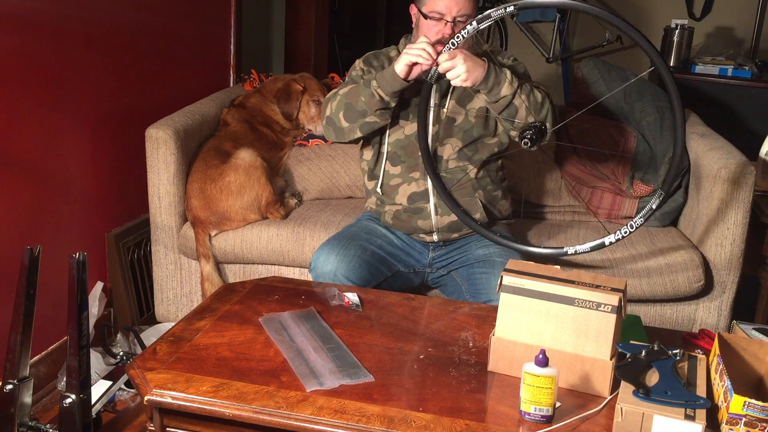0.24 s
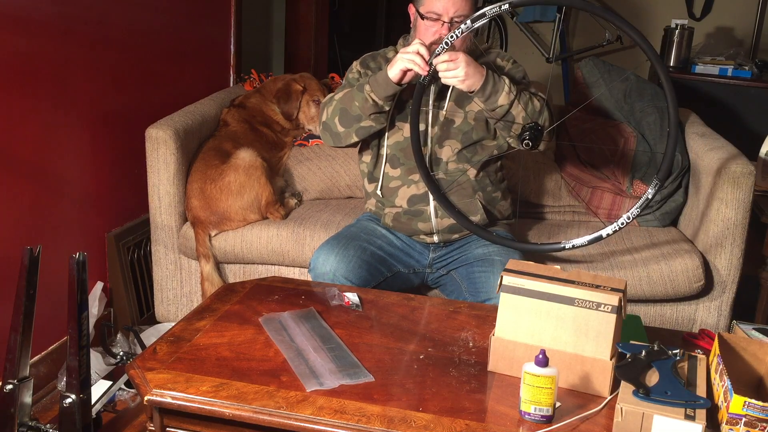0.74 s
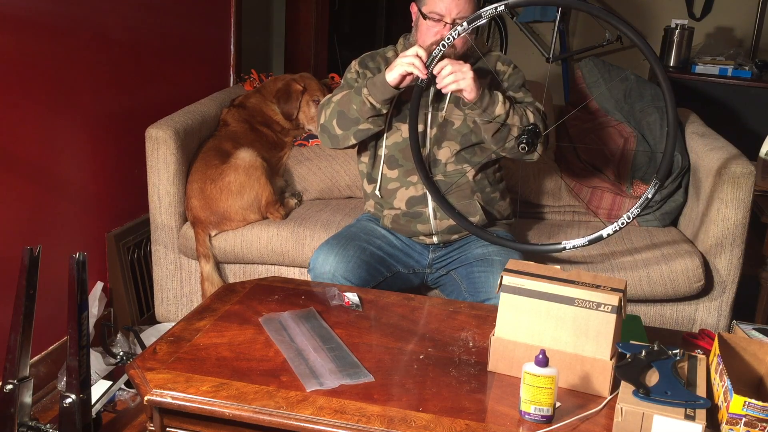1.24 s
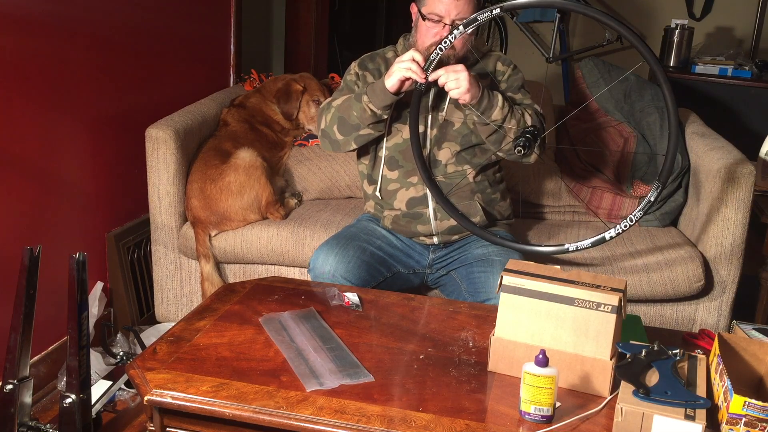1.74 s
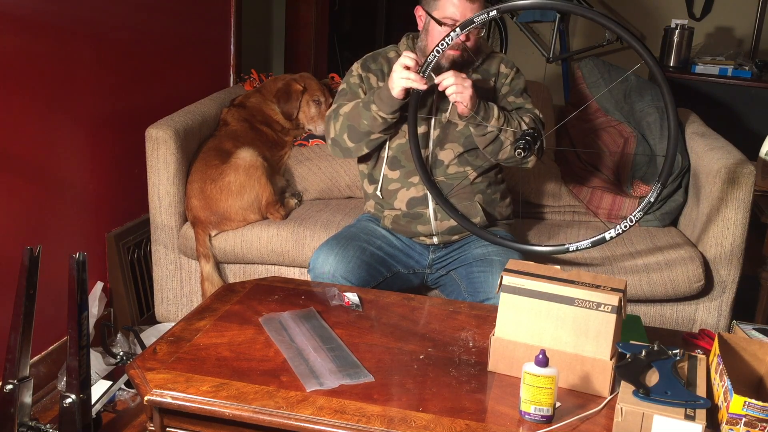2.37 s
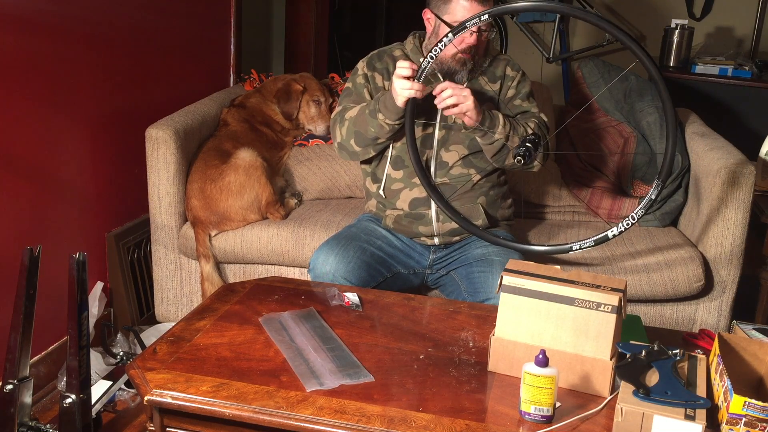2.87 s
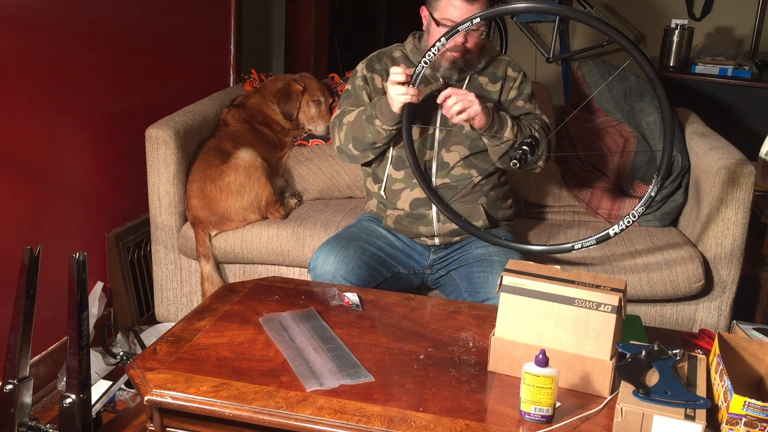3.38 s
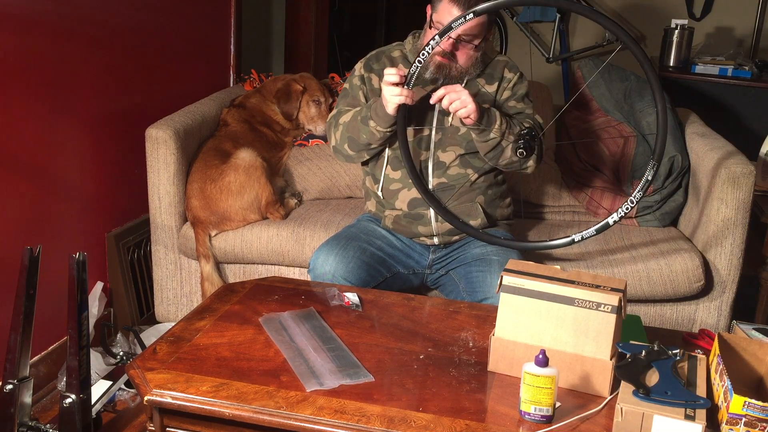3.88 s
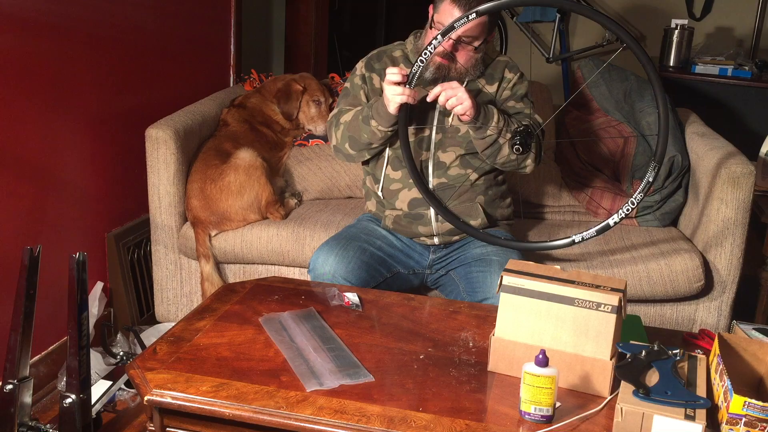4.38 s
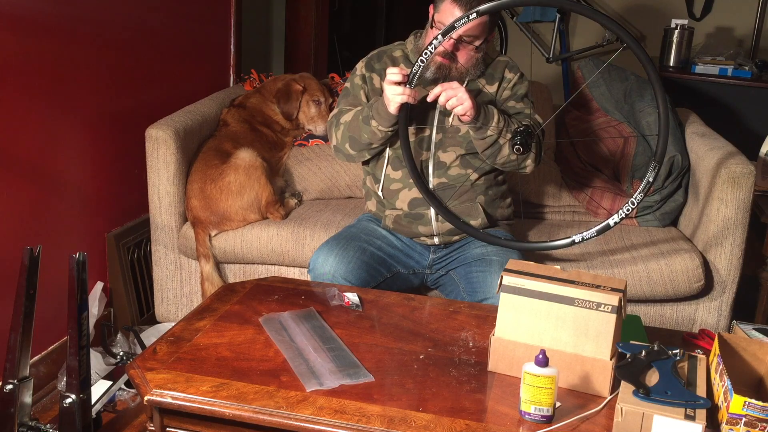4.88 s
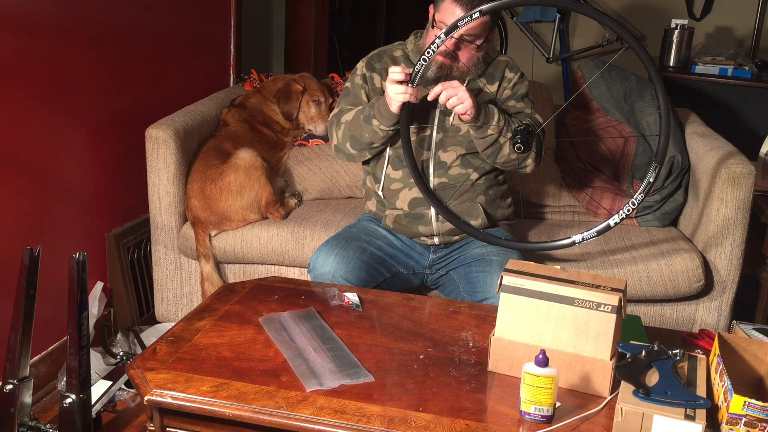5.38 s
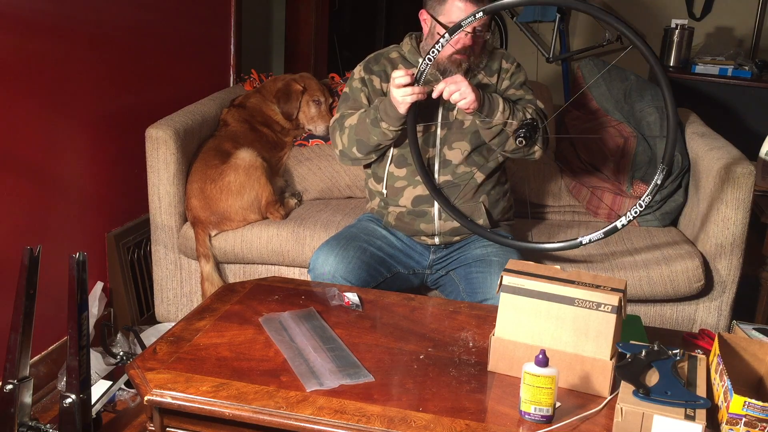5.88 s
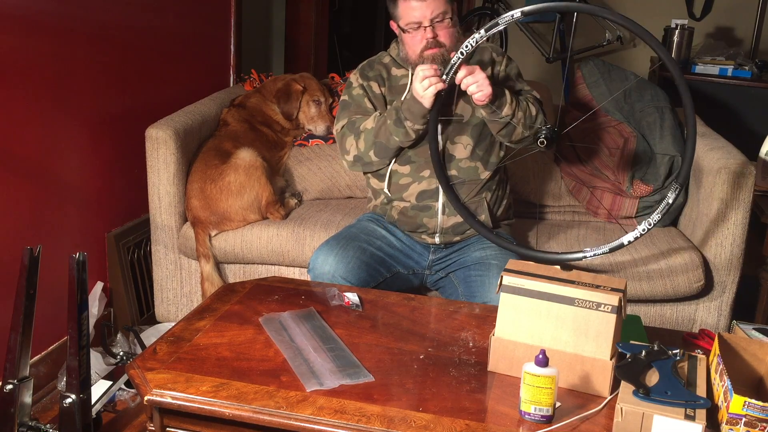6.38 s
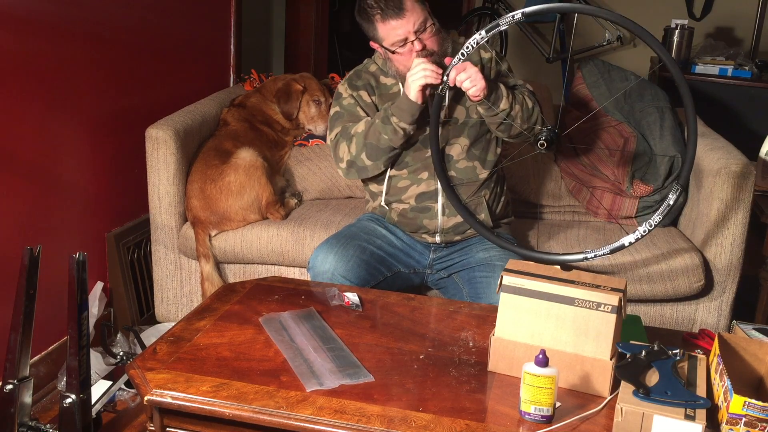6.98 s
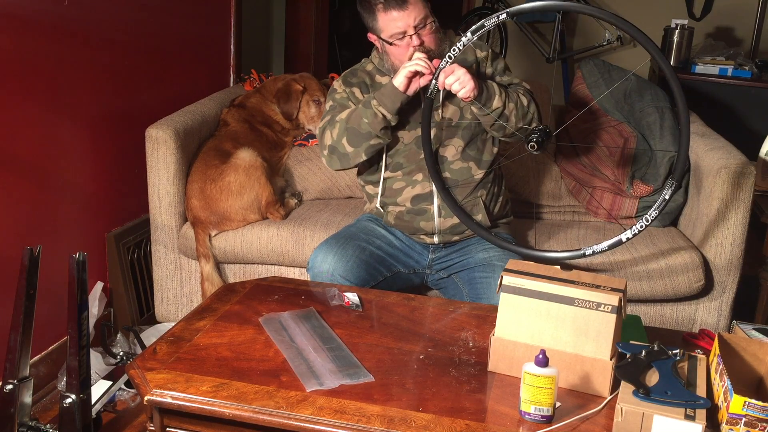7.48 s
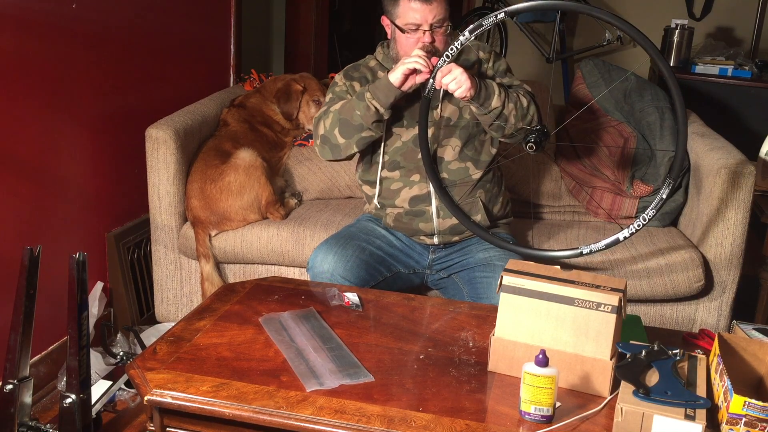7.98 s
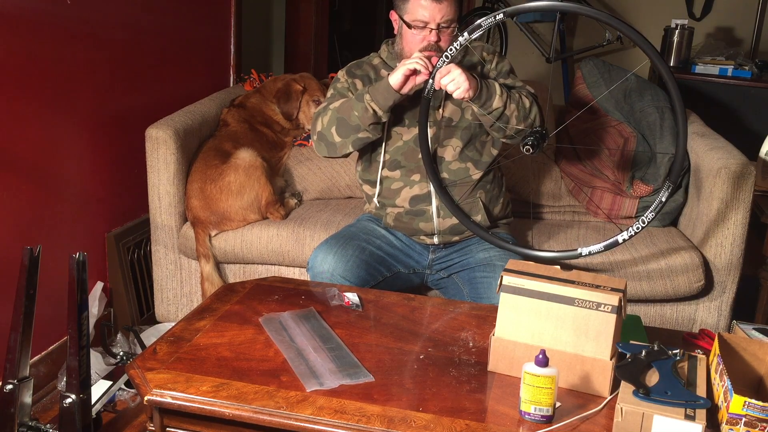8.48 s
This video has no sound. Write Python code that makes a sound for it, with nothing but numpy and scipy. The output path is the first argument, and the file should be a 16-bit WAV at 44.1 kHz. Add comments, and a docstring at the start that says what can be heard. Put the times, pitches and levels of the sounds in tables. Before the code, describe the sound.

Thin metal spokes rattle and ping at uneven intervals as someone handles a bicycle wheel indoors. Scattered light clinks lead to a run of louder clatters, a short lull and a single bright strike, followed by small clicks of spoke nipples on the rim. Each contact is up front and dies quickly in the small room. Soft cloth swishes and a faint steady hum lie underneath.

```python
"""A low appliance hum and the faint rub of hands, then a small metal tick: someone is lacing a
bicycle wheel on a living-room sofa. Nipples tick in their holes, each one hard contact with a ping.
Knocks ring single resonances of the hand-held rim. As the wheel shifts, loose steel spokes slide,
strike and chatter against each other, the hub and the rim, ringing the wheel's modes.
Sleeves and fingers swish with each change of grip, and the room answers the blows briefly."""
import sys
import numpy as np
from scipy import signal
from scipy.fft import rfft, irfft
from scipy.io import wavfile

SR = 44100
rng = np.random.default_rng(int(sys.argv[2]) if len(sys.argv) > 2 else 0)


def to_wav(sig):
    """Store sig (one row per channel, or 1-D mono) as 16-bit WAV at the path in sys.argv[1].

    Samples outside -1..1 are clipped; the rate is SR.
    """
    pcm = np.clip(np.atleast_2d(sig), -1, 1) * 32767
    pcm = np.round(pcm).astype(np.int16)
    wavfile.write(sys.argv[1], SR, pcm.T)  # frames by channels


N = 384993

# colour of the room tone: f/Hz, relative level/dB
AIR_COLOUR = [(15, -51), (25, -24), (59, -12.5), (206, -16.5), (242, -4.5), (270, -14.5), (394, -11),
              (1610, -19.5), (1740, -19.5), (2110, -18.5), (2610, -25.5), (3620, -25), (3920, -26),
              (9070, -32.5), (16000, -36.5)]
# partials of the appliance hum: f/Hz, rms level/dB
HUM_PARTIALS = [(120, -82), (239.6, -66), (298, -78.5), (395, -78.5)]
# colour of cloth and skin rubbing: f/Hz, relative level/dB
RUB_COLOUR = [(25, -12), (65, -2), (150, -1.5), (500, -1), (1200, 1), (3500, -6), (7000, -15),
              (16000, -27)]
# sleeves and fingers rub the rim as the grip shifts: middle t/s, length/s, level/dB
RUB_SWELLS = [(.6, 0.96, -65), (2.4, 1, -65), (3.603, 0.36, -65), (4.25, 0.5, -64.5), (6.25, 0.58, -62),
              (7.594, 0.72, -68.5)]
# a nipple or spoke end snaps against the rim:
# t/s, mid level/dB, low knock/dB re mids, treble/dB re mids, ping f/Hz
NIPPLE_TICKS = [ (.093, -61, 1, -3, 3540), (.316, -44, 6, -2, 1440), (.341, -47, 4.5, -7, 2580),
                (.8584, -48.5, 2, -2.5, 4050), (1.2319, -61, -18, 18, 7950), (1.514, -57, -11, 5, 14200),
                (2.182, -68, -9, 6, 14200), (2.693, -49, -32, 7.5, 13740), (2.955, -48, -12, -7.5, 3470),
                (3.156, -48.5, -17, 6, 10500), (3.3541, -51.5, -24, -7, 14240), (3.477, -57.5, 3, 2, 14000),
                (3.7829, -38.5, -4, 6.5, 9600), (4.64, -53, 12.5, -3.5, 12300),
                (5.765, -30.5, -9, 11, 13770), (6.7018, -53, 0.5, 1.5, 9700),
                (7.1757, -48, -26.5, -0.5, 7200), (7.332, -57, -15, -5, 4970),
                (7.374, -50.5, -39, 6, 13300), (7.467, -54, -14, -9, 4960), (7.568, -49.5, -9, -9, 3960),
                (7.7032, -49, -5, -10.5, 3700), (7.755, -53.5, -5, 2, 13400), (8.0619, -49, -4, 2.5, 4160),
                (8.2077, -68, -23, 14, 7500), (8.3862, -36, -9, 6.5, 14100)]
# the wheel's ring before the grip damps it: f/Hz, relative level/dB, t60/s
WHEEL_MODES = [(831, -10.5, 0.22), (1160, -6.5, 0.15), (1303.5, -2, 0.28), (1399, -4, 0.21),
               (1613, -2, 0.31), (1867.6, 3, 0.31), (2125, -7.5, 0.44), (2540, 3.5, 0.15), (2626, -6, 0.48),
               (3172, -4, 0.18), (3226, -5, 0.43), (3500, -31.5, 0.078), (3626, 0, 0.19), (3958, 2, 0.066),
               (4135, -4.5, 0.19), (4630, 0, 0.12), (5210, -10.5, 0.23), (5280, -8.5, 0.12),
               (5465, -3, 0.12), (5845, 0, 0.098), (6280, -6.5, 0.22), (6650, -2, 0.2), (7260, -7.5, 0.25),
               (8180, -6.5, 0.12), (8830, -1, 0.073), (9550, -4, 0.088), (11160, -11.5, 0.075),
               (11600, -4, 0.042), (12730, -15, .1), (14800, -6.5, .12)]
# colour of a bare metal contact: f/Hz, relative level/dB
CRACK_COLOUR = [(100, -41.5), (350, -6.5), (650, -10.5), (1000, -1.5), (1500, 4), (2100, 1.5), (3800, 0),
                (5200, -3), (6600, 0), (10300, -9.5), (14000, 1.5), (16000, -6.5)]
# decay of the living room: f/Hz, t60/s
ROOM_DECAY = [(200, 0.27), (1000, 0.29), (3000, 0.39), (7000, 0.32), (15000, 0.17)]
# knocks that each ring one rim resonance: t/s, level/dB, f/Hz, width/Hz
RIM_KNOCKS = [(.318, -52, 680, 63), (.338, -46, 663, 57), (.57, -52, 824, 36), (1.05, -47, 821, 32),
              (2.115, -57, 424, 40), (2.312, -41, 1824, 21), (2.503, -37.5, 1285, 16.4),
              (2.772, -37.5, 1863, 17), (2.85, -41.5, 910, 68.5), (3.505, -46.5, 1070, 670),
              (3.752, -60, 388, 24), (3.755, -28, 1842, 73), (4.091, -33, 1380, 160),
              (4.648, -44, 1610, 80), (5.729, -40, 789.3, 25.1), (5.7649, -23.5, 1310, 300),
              (5.768, -37.5, 534.6, 170), (5.768, -24, 3950, 230), (6.19, -50, 803, 33),
              (6.703, -48, 1440, 440), (7.58, -49, 1170, 760), (7.895, -51, 1160, 670),
              (8.386, -37, 1470, 280)]
# a loose spoke clatters: t/s, mid level/dB, low knock/dB re mids, treble/dB re mids,
# chatter decay/s, slide lead/s, rebound delay/s (0 = no slide or no rebound)
SPOKE_CLATTERS = [ (.442, -43, -4.5, -2.5, 0.013, 0.014, 0), (.495, -50.5, 4, -11, .055, 0, 0),
                  (.563, -43, -2.5, -5, 0.017, 0.041, 0.034), (1.015, -45, -3.5, -5, 0.0095, 0.0026, 0),
                  (1.0349, -41, -0.5, -9, .028, 0.0024, 0.054), (1.45, -65, -2, -11, .015, 0, 0.004),
                  (1.535, -50, -1, -7.5, .007, 0.00056, 0.0021),
                  (1.681, -45.5, -6.5, -3, 0.0079, 0.016, 0.03), (1.898, -51.5, -2.5, -6, 0.0059, 0.015, 0),
                  (2.088, -51.5, -4.5, -4, 0.024, 0, 0.0013),
                  (2.299, -42.5, -8, -20.5, 0.013, 0.0065, 0.00086),
                  (2.369, -57.5, -22, -9, 0.0055, 0.0047, 0), (2.497, -34.5, -7, -8, 0.048, 0.0077, .105),
                  (2.758, -42, -6, -15.5, 0.029, 0.0043, 0.0015), (2.835, -32, -4.5, -2, 0.036, .029, 0),
                  (3.032, -50, -1.5, 2, 0.016, 0.0022, 0.00092), (3.153, -51, 0.5, -7, 0.025, 0, 0),
                  (3.404, -47.5, -6, -6, 0.013, 0.018, 0.0013),
                  (3.589, -62.5, -4, -33, 0.0062, 0.0016, 0.00059), (3.7497, -34, 0, -8, .011, .018, .05),
                  (3.99, -36.5, -10.5, -10.5, 0.025, 0.0071, 0.00069),
                  (4.028, -32.5, -4, -5, 0.051, 0, 0.068), (4.463, -52, -2, -30.5, 0.0051, .02, 0),
                  (4.981, -66, 5.5, -16, 0.023, 0.0024, 0), (5.333, -51, -0.5, -13.5, 0.013, 0.021, 0),
                  (5.728, -45.5, 5, -4.5, 0.027, 0.014, 0.00082),
                  (5.767, -23.5, -6.5, -4, 0.03, 0.023, 0.068),
                  (6.119, -55.5, -9, -4, .012, 0.0038, 0.0046), (6.189, -50.5, -4, -13, 0.0078, 0.023, 0),
                  (8.541, -64, -17, -5, .004, 0, 0)]

CUTOFF_HZ = 15850
SIZE = 24576  # samples in one blow
T, HZ = np.arange(SIZE) / SR, np.fft.rfftfreq(2 * SIZE, 1 / SR)  # a blow's time and frequency axes
SCENE_T = np.arange(N) / SR


def amp(db):
    """Decibels to gain."""
    return 10 ** (np.asarray(db) / 20)


def unit(x):
    """Scales to an energy of one."""
    return x / np.sqrt(np.sum(x ** 2) + 1e-20)


def curve(points, hz):
    """Reads a table along a log-frequency axis."""
    f, value = np.transpose(points)
    return np.interp(np.log(hz + 1), np.log(f + 1), value)


def spectrum(x):
    """Spectrum of one blow, padded for its tail."""
    return rfft(x, 2 * SIZE)


def add(mix, s, sound):
    """Mixes a sound in at s seconds."""
    part = mix[max(round(s * SR), 0):][:len(sound)]
    part += sound[:len(part)]


def noise(points):
    """A steady bed of coloured noise with an rms of one."""
    colour = amp(curve(points, np.fft.rfftfreq(N, 1 / SR)))
    return unit(irfft(rfft(rng.standard_normal(N)) * colour, N)) * np.sqrt(N)


def drift(per_s):
    """A random wander of about unit size."""
    position = np.arange(N) * per_s / SR
    count = int(position[-1]) + 2
    return np.interp(position, np.arange(count), rng.standard_normal(count))


def room_tone(air_db=-62.5, waver_rad=0.124):
    """Still room air under an appliance hum whose partials waver gently."""
    hum = sum(amp(db) * np.sqrt(2) * np.sin(2 * np.pi * hz * SCENE_T + waver_rad * drift(per_s=15))
              for hz, db in HUM_PARTIALS)
    return amp(air_db) * noise(AIR_COLOUR) + hum


def handling(holding_db=-65.5, grain_db=3):
    """Cloth and skin rub with a rough grain, swelling with each shift of the grip."""
    swells = sum(amp(db) ** 2 * np.exp(-(2 * (SCENE_T - s) / length_s) ** 2)
                 for s, length_s, db in RUB_SWELLS)
    envelope = np.sqrt(amp(holding_db) ** 2 + swells)
    return noise(RUB_COLOUR) * envelope * amp(grain_db * drift(per_s=110))


def wheel_modes(neighbours_db=-7, spread=0.024, jitter=0.008):
    """Each mode of the wheel rings with those of four neighbouring spokes, slightly out of tune."""
    hz, db, t60 = np.transpose(WHEEL_MODES)[:, :, None]
    tunings = 1 + np.linspace(-spread, spread, 4)[:, None, None]
    tunings = tunings + jitter * rng.uniform(-1, 1, (4, len(hz), 1))
    decay = amp(db - 60 * T / t60)
    neighbours = [amp(neighbours_db) * decay * np.exp(2j * np.pi * hz * ratio * T) for ratio in tunings]
    return np.vstack([decay * np.exp(2j * np.pi * hz * T)] + neighbours)


def radiation(corner_hz=170):
    """Thin metal moves little air at low pitch."""
    return (1j * HZ / (corner_hz + 1j * HZ)) ** 2


def strike(modes, ring_db, crack_s, held_s, scatter_db=2, flex=0.0033, edge=1.94, edge_s=0.00027):
    """Spectrum of one contact: a sharp crack, and a mix of modes that depends on the spot struck."""
    spot = amp(scatter_db * rng.standard_normal(len(modes)))
    spot = spot * np.exp(2j * np.pi * rng.random(len(modes)))
    bend = 1 + flex * rng.standard_normal()  # flexing shifts the pitch a little
    ring = np.interp(T * bend, T, (spot @ modes).real)
    ring *= np.exp(-T / held_s)  # the grip damps the ring
    fade = np.exp(-T / crack_s) + edge * np.exp(-T / edge_s)
    crack = irfft(spectrum(rng.standard_normal(SIZE) * fade) * amp(curve(CRACK_COLOUR, HZ)))
    return (spectrum(unit(crack)) + amp(ring_db) * spectrum(unit(ring))) * radiation()


def room(tail_db, early_db, early_s=0.0063, echoes_per_s=3000, bloom_s=0.0053):
    """Room response: direct sound, close reflections from rim and table, and a short diffuse tail."""
    hz, t, wash = signal.stft(rng.standard_normal(SIZE), SR, nperseg=256)
    decay = amp(-60 * t / curve(ROOM_DECAY, hz)[:, None])
    tail = signal.istft(wash * decay, SR, nperseg=256)[1][:SIZE]
    tail *= 1 - np.exp(-T / bloom_s)
    early = rng.standard_normal(SIZE) * (rng.random(SIZE) < echoes_per_s / SR) * np.exp(-T / early_s)
    return spectrum((T == 0) + amp(early_db) * unit(early) + amp(tail_db) * unit(tail))


def voice(blow, db, knock_db, treble_db, attack_s, soft_hz=3600, softness=0.65):
    """Three-band EQ: turns a blow's spectrum into sound with set attack levels in lows, mids and top."""
    octaves_up = np.log2(1 + (HZ / soft_hz) ** 4) / 4
    # a soft contact loses the upper mids too
    dull = amp(softness * min(treble_db, 0) * np.minimum(octaves_up, 1))
    low = 1 / (1 + (HZ / 2150) ** 8)
    high = 1 - 1 / (1 + (HZ / 6900) ** 6)
    crossover = np.array([low, 1 - low - high, high * (HZ < CUTOFF_HZ)])
    bands = irfft(blow * dull * crossover)[:, :SIZE]
    attack_rms = np.sqrt(np.mean(bands[:, T < attack_s] ** 2, axis=1))
    gains = amp(db + np.array([knock_db, 0, treble_db])) / attack_rms
    return gains @ bands


def nipple_ticks(modes, ping_width_hz=900, ping_db=7):
    """A nipple snaps against the rim: one hard contact with a ping, the wheel choked by the fingers."""
    out = np.zeros(N)
    for s, db, knock_db, treble_db, ping_hz in NIPPLE_TICKS:
        ping = 1 + amp(ping_db) / (1 + 2j * (HZ - ping_hz) / ping_width_hz)
        blow = ping * strike(modes, ring_db=-3.5, crack_s=0.0054, held_s=0.019)
        blow *= room(tail_db=-0.5, early_db=3)
        add(out, s, voice(blow, db, knock_db, treble_db, attack_s=0.0059))
    return out


def rim_knocks(skirt_widths=3, attack_s=0.015):
    """Each knock rings one damped resonance of the hand-held rim."""
    out = np.zeros(N)
    for s, db, hz, width_hz in RIM_KNOCKS:
        offset = 2j * (HZ - hz) / width_hz
        resonance = 1 / (1 + offset) / (1 + offset / skirt_widths)
        knock = irfft(resonance * radiation() * room(tail_db=0.5, early_db=3))[:SIZE]
        attack_rms = np.sqrt(np.mean(knock[T < attack_s] ** 2))
        add(out, s, amp(db) * knock / attack_rms)
    return out


def chatter(modes, db, knock_db, treble_db, chatter_s, build_s,
            contacts_per_s=1300, bounce=0.24, soft_s=0.0056, uneven_db=3):
    """A spoke strikes or slides in, then bounces at random, ever more weakly; a few contacts are hard."""
    sizes = amp(uneven_db * np.minimum(rng.exponential(1, SIZE), 4)) * rng.choice([-1, 1], SIZE)
    contacts = (rng.random(SIZE) < contacts_per_s / SR) * rng.uniform(0.13, 1, SIZE) * sizes
    vigour = T ** 2 / (T ** 2 + build_s ** 2) * np.exp(-(T / chatter_s) ** 2 / 2)
    first_hit = (T == 0) * np.exp(-(build_s / soft_s) ** 2)  # a slow build softens the first hit
    force = spectrum(first_hit + bounce * contacts * vigour)
    blow = force * strike(modes, ring_db=4.5, crack_s=0.0036, held_s=0.066)
    blow *= room(tail_db=-3, early_db=4)
    return voice(blow, db, knock_db, treble_db, attack_s=0.044)


def spoke_clatters(modes, typical_blow_db=-40.5, typical_slide_db=-47, rebound_loss_db_per_s=113):
    """A loose spoke lands with a chatter; it may slide in first, and may spring off and fall back."""
    out = np.zeros(N)
    for s, db, knock_db, treble_db, chatter_s, slide_s, rebound_s in SPOKE_CLATTERS:
        build_s = 0.0021 * 2 ** (-treble_db / 13.5)  # each 13.5 dB less treble doubles the build time
        add(out, s, chatter(modes, db, knock_db, treble_db, chatter_s, build_s))
        if slide_s > 0:
            slide_db = typical_slide_db + 0.83 * (db - typical_blow_db)  # grows less than the blow
            slide_treble_db = min(treble_db, -9)  # a slide is never bright
            slide = chatter(modes, slide_db, knock_db, slide_treble_db, slide_s, build_s=0.008)
            add(out, s - slide_s, slide)
        if rebound_s > 0:
            rebound_db = db - rebound_loss_db_per_s * rebound_s
            rebound = chatter(modes, rebound_db, knock_db, treble_db, chatter_s=0.031, build_s=0.0016)
            add(out, s + rebound_s, rebound)
    return out


def scene():
    """The mono mix: the wheel's metal up front, over handling and room tone."""
    modes = wheel_modes()
    metal = spoke_clatters(modes) + nipple_ticks(modes) + rim_knocks()
    return (metal + handling() + room_tone())[None]


def record(dry, low_cut_hz=36):
    """Rolls off the deep bass and cuts the very top."""
    low_cut = signal.butter(2, low_cut_hz, "highpass", fs=SR, output="sos")
    high_cut = signal.firwin(511, CUTOFF_HZ, window=("kaiser", 9), fs=SR)
    return signal.oaconvolve(signal.sosfilt(low_cut, dry), high_cut[None], "same")


dry = scene()
out = record(dry)
to_wav(out)
```